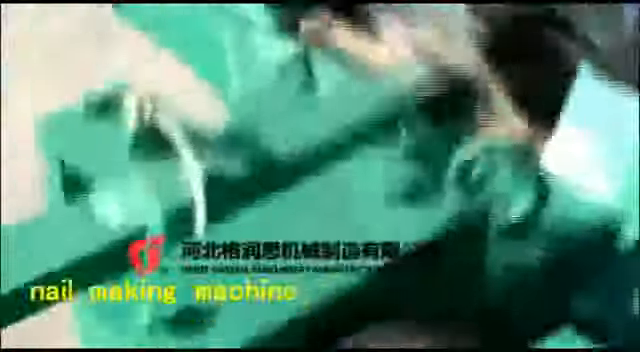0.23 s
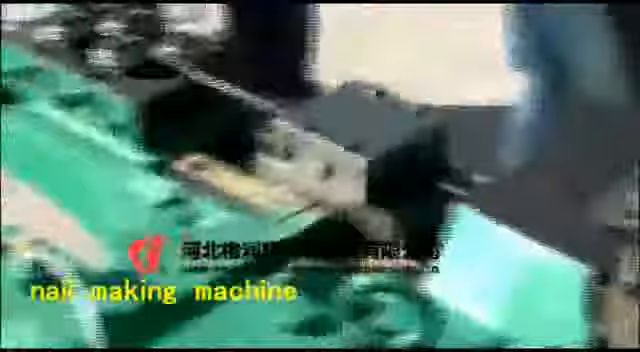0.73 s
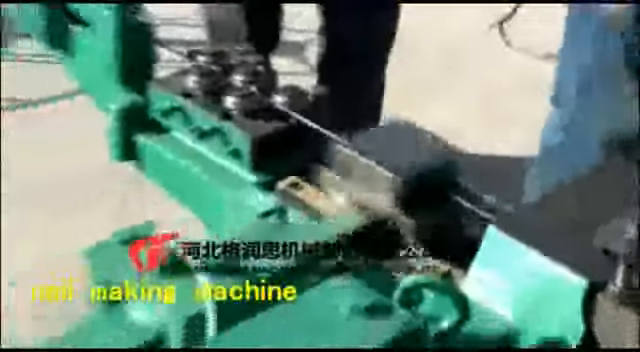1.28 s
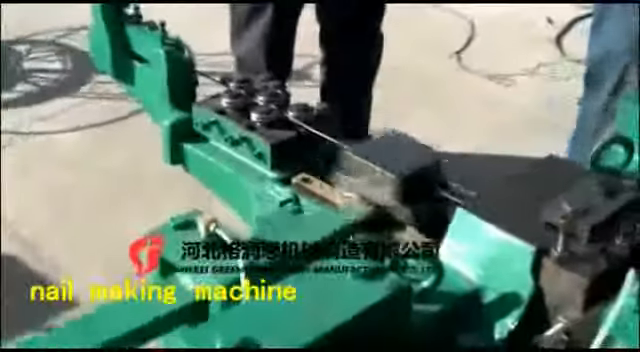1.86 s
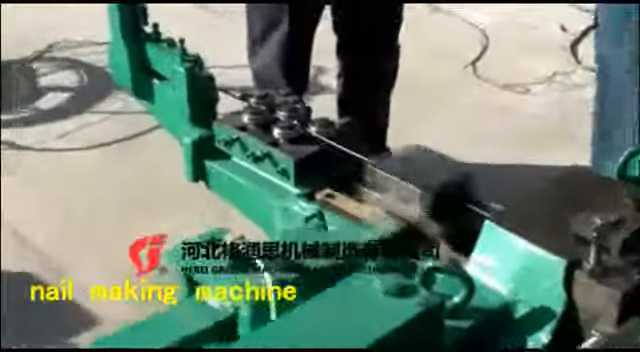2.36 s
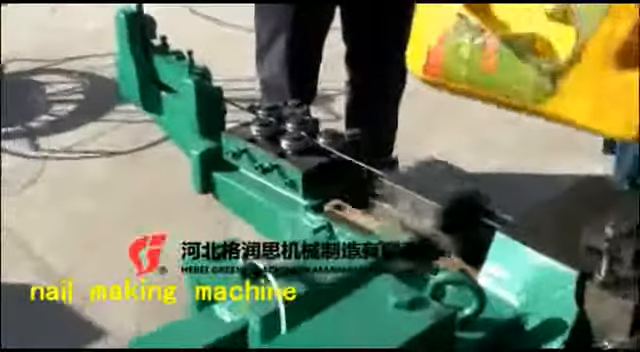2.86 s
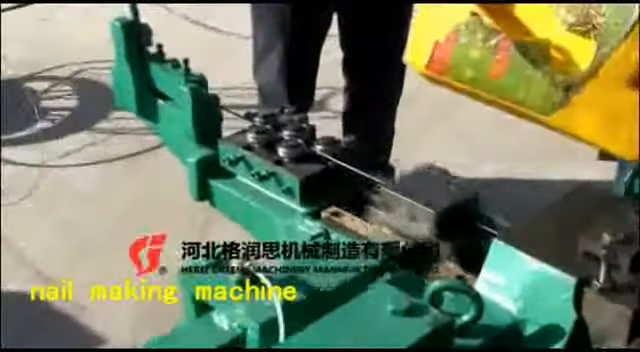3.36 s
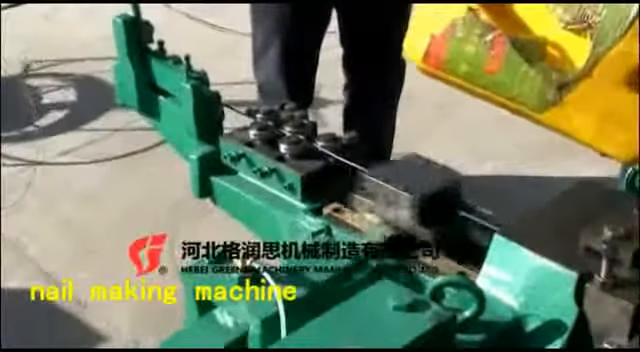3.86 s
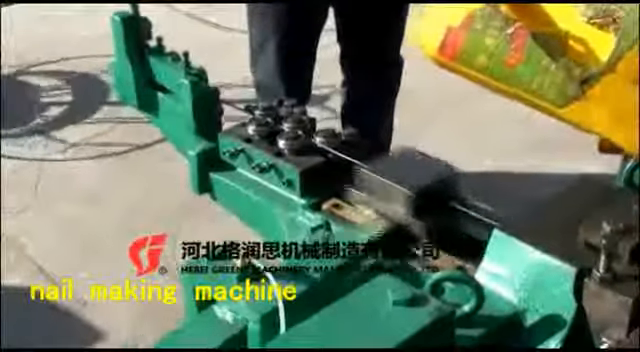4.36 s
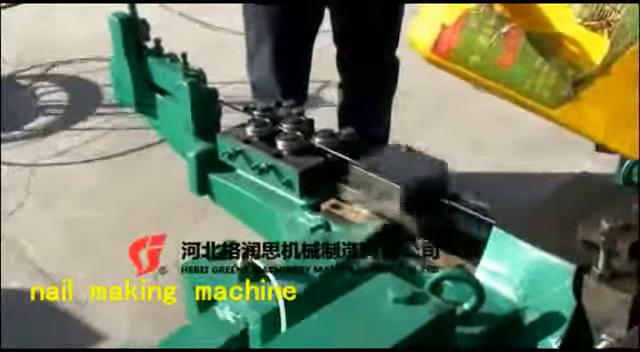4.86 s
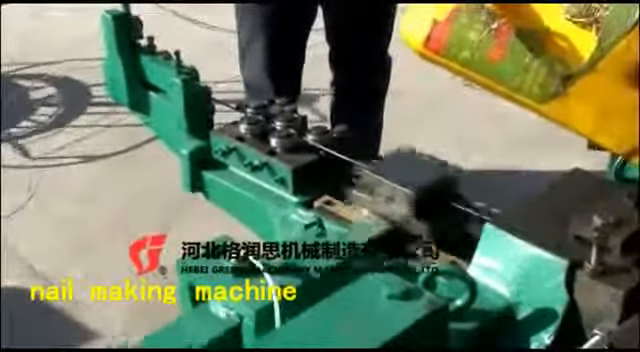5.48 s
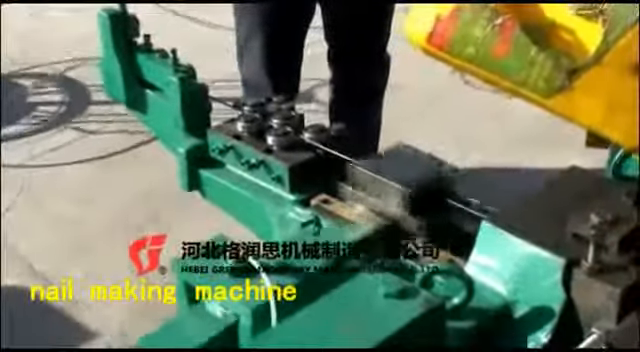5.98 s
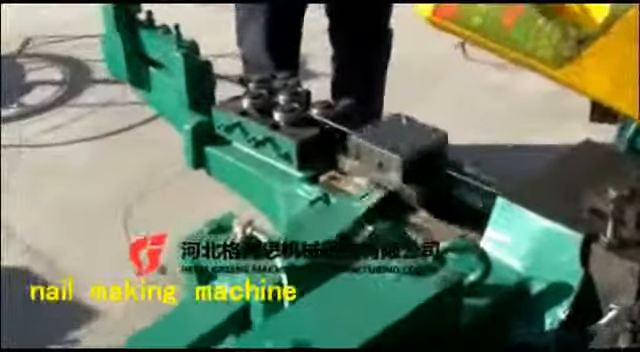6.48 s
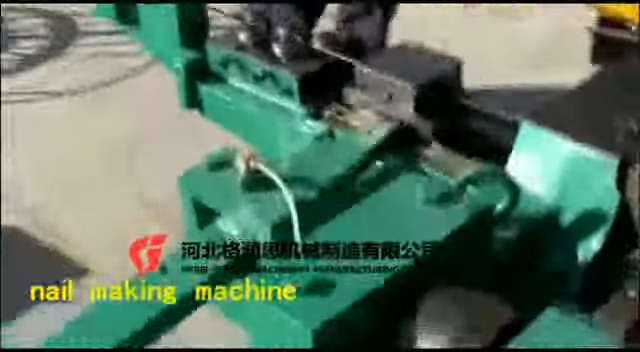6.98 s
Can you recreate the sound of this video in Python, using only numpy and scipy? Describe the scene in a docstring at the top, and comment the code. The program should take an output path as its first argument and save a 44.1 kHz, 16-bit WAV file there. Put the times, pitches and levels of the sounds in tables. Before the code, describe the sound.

From 0 to about 7 seconds a wire nail machine runs without pause in open air, close and somewhat to the right. The first punch lands almost at once, then one follows every 0.24 seconds at a fixed pace. Each turn starts with a short grip clunk, then a hard mid-pitched clank with a quick double edge and a shuddering, briefly ringing frame. Rapid gear ticks swell late in the turn; wire scrapes forward, and about 0.14 seconds after the punch blades snap it with a bright crack and rattle. Scrapes vary, rasping harder on some turns. Blows ease slightly around 2.7 seconds. Small high pings glitter irregularly throughout. Low wind puffs, stronger at left, pulse with the turns, weak from 2.4 to 4 seconds, stronger around 4.1 to 5.4 and again from 5.75. Everything is dense, narrow-band, compressed and crunchy at peaks, still running at the end.

```python
"""A wire nail machine hammers in open air, close by and to the right, a little over four nails a second.
On each turn the dies grip, the punch heads the nail and shakes the cast frame, the wire scrapes forward and
the cutters snap it off: shaped noise through resonances, plus decaying sines. Gears click all the while,
short high sines ping at chance moments, and a draught of low noise puffs once a turn.
A limiter and a narrow band squash the sum; the loudest peaks clip."""
import sys
import numpy as np
from scipy import signal
from scipy.fft import rfft, irfft
from scipy.io import wavfile
from scipy.ndimage import uniform_filter1d

SR = 44100
rng = np.random.default_rng(int(sys.argv[2]) if len(sys.argv) > 2 else 0)


def generate_wav(signal):
    """Clip the signal to [-1, 1] and save it as 16-bit WAV at the path in sys.argv[1]."""
    frames = np.transpose(np.atleast_2d(signal))
    scaled = np.clip(frames, -1, 1) * 32767
    pcm = np.round(scaled).astype(np.int16)
    wavfile.write(sys.argv[1], SR, pcm)


N = 318843

# Resonances of the frame and its tooling. Each row: centre in Hz, width in Hz, lift in dB.
FRAME = [(161.6, 24, 4), (258.5, 6.8, 3), (350.7, 55, 11), (377, 12, 7.5), (584, 29, 6.5), (815, 26, 7),
         (1083, 20, 4.5), (1427, 32, 8), (2283, 120, 1.5), (2687, 120, 5), (3144, 46, 9.5), (3956, 100, 8),
         (4893, 61, 9), (5400, 43, 9)]
# How much of the vibration repeats on every turn. Each row: pitch in Hz, share of power from 0 to 1.
ALIKE = [(50, 0.1), (160, 0.86), (350, 0.71), (800, 0.58), (1400, 0.42), (2500, 0.17), (5000, 0)]

FIRST_PUNCH_S, TURN_S = .0426, .23599
# One turn is built in a buffer of SIZE samples that opens LEAD_S before its punch.
SIZE, LEAD_S = 16384, .03
AGE = np.arange(SIZE) / SR - LEAD_S  # seconds since the punch
HZ = np.fft.rfftfreq(SIZE, 1 / SR)


def amp(db):
    """Decibels to gain."""
    return 10 ** (np.asarray(db) / 20)


def evened(x):
    """Scales to rms 1."""
    return x / np.sqrt(np.mean(x ** 2) + 1e-20)


def read(points, hz):
    """Reads a table along a log-frequency axis."""
    f, value = np.transpose(points)
    return np.interp(np.log(hz + 1), np.log(f + 1), value)


def colour(spectrum, resonances):
    """Minimum-phase response that gives white noise this spectrum, lifted at the resonances."""
    db = read(spectrum, HZ)
    for f, width, lift in resonances:
        db = db + lift / (1 + (2 * (HZ - f) / width) ** 2)
    log_gain = np.log(amp(db))
    # the Hilbert transform of the log gain gives the phase of a causal response
    mirrored = np.r_[log_gain, log_gain[-2:0:-1]]
    phase = -signal.hilbert(mirrored).imag[:len(HZ)]
    return np.sqrt(SR / 2) * np.exp(log_gain + 1j * phase)


def blow(at, rise, t60):
    """Force that builds up linearly and dies away exponentially, once in the turn; times in seconds."""
    age = AGE - at
    attack = np.clip(age / max(rise, 1 / SR), 0, 1)
    return attack * np.exp(-np.log(1000) * np.maximum(age - rise, 0) / t60)


def chatter(force, alike, count, patchy_db=0, size=40):
    """Spectra (turns, channels, bins) of metal contact: noise partly the same on every turn, partly new."""
    # Left-right likeness of the noise. Each row: pitch in Hz, likeness from 0 to 1.
    likeness = [(60, 0.34), (130, 1), (270, 0.87), (580, 0.88), (1230, 0.85), (2630, 0.52), (5590, 0.48)]
    z = rfft(force * rng.standard_normal((count + 1, 2, SIZE)))
    same = np.clip(read(likeness, HZ), 0, 1)
    z[:, 0] = same * z[:, 1] + np.sqrt(1 - same ** 2) * z[:, 0]
    # the repeating part feeds all pitches evenly, taken over `size` bins
    local_level = np.sqrt(uniform_filter1d(abs(z[0]) ** 2, size=size) + 1e-12)
    repeated = z[0] * np.linalg.norm(force) / local_level
    # the new part is louder at some pitches and softer at others
    patches = uniform_filter1d(rng.standard_normal((count, 1, len(HZ))), size=50)
    patches = evened(uniform_filter1d(patches, size=40))
    patches = np.tanh(patches)  # no pitch stands out far enough to ping
    fresh = z[1:] * amp(patchy_db * patches)
    alike = np.clip(alike, 0, 1)
    return np.sqrt(alike) * repeated + np.sqrt(1 - alike) * fresh


def wind(gust_db=1.5, gusts_per_s=14, side_db=2.0, shared=0.36):
    """Air buffets the microphone as low noise, stronger at left: it swells once a turn and gusts by chance."""
    # Tone of the buffeting. Each row: pitch in Hz, relative level in dB.
    air_tone = [(15, -16), (45, 2.5), (95, 5), (150, 0.5), (260, -22.5), (700, -45.5)]
    # Strength of the draught between its puffs. Each row: time in seconds, level in dB.
    draught = [(0, -34.5), (1.1, -37.5), (1.5, -32.5), (2.0, -33.5), (2.4, -47), (3.1, -50.5),
               (3.95, -49.5), (4.1, -30), (4.35, -28), (5.4, -34), (5.5, -45), (5.68, -43), (5.75, -26.5),
               (6.9, -33), (7.1, -40)]
    t = np.arange(N) / SR
    # the moving parts push air once a turn, after the punch
    puff_after_s, puff_width_s, puff_db = 0.064, 0.045, 7.5
    from_puff = (t - FIRST_PUNCH_S - puff_after_s + TURN_S / 2) % TURN_S - TURN_S / 2
    puffs = np.exp(-(from_puff / puff_width_s) ** 2)
    gusts = np.interp(t * gusts_per_s, np.arange(256), rng.standard_normal(256))
    tone_gain = amp(read(air_tone, np.fft.rfftfreq(N, 1 / SR)))
    left, other = irfft(rfft(rng.standard_normal((2, N))) * tone_gain, N)
    right = shared * left + other
    ports = np.array([amp(side_db) * evened(left), amp(-side_db) * evened(right)])
    strength_db = np.interp(t, *np.transpose(draught)) + puff_db * puffs + gust_db * gusts
    return ports * amp(strength_db)


def pings(level_db=-36, per_s=140, low_hz=2500, high_hz=5700, t60=0.068, spread_db=3, left_db=-6):
    """Short high decaying sines at chance moments, on 30 pitches."""
    t = np.arange(SR // 8) / SR
    out = np.zeros((2, N))
    pitches = np.geomspace(low_hz, high_hz, num=30)
    for hz, chance, side in zip(pitches, rng.random((30, N)), rng.standard_normal(30)):
        odds = per_s / 30 / SR  # of a ping at this pitch on any one sample
        at = np.flatnonzero(chance < odds)
        ping = np.sin(2 * np.pi * hz * t) * np.exp(-np.log(1000) * t / t60)
        ping = ping * np.sqrt(low_hz / hz)  # higher pings are softer
        sizes = amp(spread_db * np.minimum(-np.log(chance[at] / odds), 3))
        sides = amp([[left_db + 3 * side], [0]])
        for start, size in zip(at, sizes):
            out[:, start:start + len(t)] += size * sides * ping[:N - start]
    return amp(level_db) * evened(out)


def running(count):
    """Slides and bearings rumble all the way round as steady noise; one turn fades into the next."""
    # Rumble spectrum. Each row: pitch in Hz, level in dB per Hz before the frame's lift.
    rumble = [(20, -63), (50, -60.5), (110, -60), (160, -48.5), (250, -52), (470, -48.5), (620, -47),
              (1000, -52), (1900, -57), (2500, -60.5), (3200, -66.5), (4100, -75), (5600, -76)]
    fade_in, fade_out = AGE + LEAD_S, TURN_S - AGE
    force = np.sqrt(np.clip(np.minimum(fade_in, fade_out) / LEAD_S, 0, 1))
    return chatter(force, read(ALIKE, HZ), count, patchy_db=2.5) * colour(rumble, FRAME)


def gears(count, uneven=0.12):
    """Gear teeth meet as single clicks; their rate sags after the punch, climbs late, then falls back."""
    # Gear teeth over one turn. Each row: seconds after the punch, teeth a second, relative level in dB.
    teeth = [(0, 150, -11.5), (.06, 138, -8.5), (.115, 138, -20), (.135, 149, -3), (.15, 167, 4.5),
             (.172, 173, 2), (.19, 184, -7.5), (.21, 168, 0), (0.237, 152, -3.5)]
    # Tone of the clicks. Each row: pitch in Hz, relative level in dB per Hz.
    click_tone = [(300, -82), (600, -55), (800, -47), (1030, -49), (1300, -66.5), (2500, -75), (5500, -88)]
    s, rate, db = np.transpose(teeth)
    tooth = np.floor(np.cumsum(np.interp(AGE, s, rate)) / SR)
    clicks = np.diff(tooth, prepend=0) * (AGE >= 0) * (AGE < TURN_S)
    force = clicks * np.sqrt(SR / rate.mean()) * amp(np.interp(AGE, s, db))
    strikes = force * (1 + uneven * rng.standard_normal((count, 1, SIZE)))
    return rfft(strikes) * colour(click_tone, [])


def ringing(count, spread_db=2.5, detune=0.0066):
    """Frame and tooling modes ring as decaying sines, struck almost alike each time."""
    # Modes that ring on every turn.
    # Each row: seconds after the punch, pitch in Hz, relative level in dB, rise in seconds, t60 in seconds.
    modes = [(0, 1422, -10, 0.0074, 0.093), (-.001, 582, -5, 0.0015, 0.027), (.005, 349, -15, 0.018, .29),
             (.016, 165, -18.5, 0.026, 0.16), (.026, 253, -20.5, 0.03, 0.45),
             (0.055, 2400, -27, 0.046, 0.12), (.06, 572, -16.5, 0.0077, 0.42),
             (-0.0072, 2200, -21.5, 0.0019, 0.05), (-0.012, 4790, -29.5, 0.032, 0.078)]
    out = 0
    for at, hz, db, rise, t60 in modes:
        size, pitch = rng.standard_normal((2, count, 1, 1))
        envelope = amp(db + spread_db * size) * blow(at, rise, t60)
        mode_hz = hz * (1 + detune * pitch)
        out = out + envelope * np.sin(2 * np.pi * mode_hz * (AGE - at))
    return rfft(out)


def feeding(count, slip_db=3.5):
    """Wire drags through the straightening rollers until the cut: noise that sticks and slips anew each turn."""
    # Tone of the scrape. Each row: pitch in Hz, relative level in dB per Hz.
    scrape_tone = [(700, -75), (2400, -58.5), (3200, -58), (4200, -61.5), (5600, -62.5), (7000, -72.5)]
    force = np.interp(AGE, [.088, .115, .138, .146], [0.2, 0.69, 1, 0.048])
    slip_noise = uniform_filter1d(rng.standard_normal((count, 1, SIZE)), size=130)
    slips = amp(slip_db * evened(slip_noise))
    scrape = irfft(chatter(force, 0, count, patchy_db=3.5)) * evened(slips)
    return rfft(scrape) * colour(scrape_tone, [])


def cutting(count):
    """The blades snap through the wire and meet in two short noise blows; the slide rattles back."""
    # Resonances of the cutter blades. Each row: centre in Hz, width in Hz, lift in dB.
    blade_modes = [(801, 53, 14), (1894, 220, 17.5), (3040, 57, 7), (3195, 110, 11.5), (4300, 62, 7),
                   (4800, 90, 4.5), (5200, 43, 5.5)]
    # Tones of the snap and of the returning slide. Each row: pitch in Hz, relative level in dB per Hz.
    snap_tone = [(300, -65.5), (800, -39.5), (1400, -44), (2400, -48), (3300, -41.5), (4500, -44),
                 (5600, -46), (9000, -42)]
    return_tone = [(400, -66), (800, -54.5), (1050, -48), (1400, -52.5), (2000, -54.5), (2500, -59.5),
                   (3200, -59), (4500, -62.5), (5600, -66.5)]
    snap = blow(.1444, 0.00028, 0.015) + amp(-7) * blow(.1472, 0, 0.017)
    blades = chatter(snap, 0.75, count, size=400) * colour(snap_tone, blade_modes)
    rattle = chatter(blow(0.1392, 0.0086, 0.29), read(ALIKE, HZ), count, patchy_db=6.5)
    return blades + rattle * colour(return_tone, FRAME)


def heading(count):
    """The dies close, the punch strikes and seats, and the frame shudders as the load lets go."""
    # Tones of the three stages. Each row: pitch in Hz, relative level in dB per Hz.
    grip_tone = [(60, -60.5), (160, -57.5), (250, -53), (400, -45), (800, -53.5), (1900, -63.5),
                 (2600, -55), (4700, -64), (5500, -58)]
    punch_tone = [(60, -65), (250, -50), (380, -44), (650, -43), (1050, -47), (1400, -46.5), (1900, -47),
                  (2500, -54), (3200, -59), (3900, -57.5), (4800, -75.5), (5600, -66)]
    shudder_tone = [(25, -64), (55, -51.5), (110, -55.5), (170, -44.5), (330, -44), (500, -52.5),
                    (1050, -46), (1900, -52.5), (2600, -54), (3300, -60.5), (5500, -69.5)]
    alike = read(ALIKE, HZ)
    grip = chatter(blow(-0.013, 0.0032, 0.1), alike, count, patchy_db=5) * colour(grip_tone, FRAME)
    crack = amp(-2) * blow(0, 0, .016) + amp(-4) * blow(.0068, 0, .016)
    strike = crack + blow(0, 0, 0.26) + amp(-11.5) * blow(0.025, 0, 0.08)
    punch = chatter(strike, alike, count, patchy_db=5.0, size=80) * colour(punch_tone, FRAME)
    release = blow(0.02, 0.021, 0.2) + amp(-3.5) * blow(0.023, 0, 0.043)
    shudder = chatter(release, alike, count, patchy_db=4.5) * colour(shudder_tone, FRAME)
    return grip + punch + shudder


def machine():
    """Lays the turns end to end at a steady speed; the machine is already running at the start."""
    # Weight of the punch, uneven but easing overall. Each row: time in seconds, level in dB.
    weight = [(0, .5), (2.1, -0.1), (2.7, -2.6), (4, -1), (4.7, -2.66), (7.2, -1.5)]
    # Turns on which the wire binds in the rollers. Each row: turn counted from 0, scrape level in dB.
    binds = [(0, 5.5), (2, 6), (5, 2.5), (7, -0.5), (9, 1), (10, 3.5), (11, 1.5), (14, -1), (15, 4),
             (16, 3.5), (19, 5), (22, 4), (26, 3.5), (28, 2.5), (30, 4)]
    # The machine stands to the right. Each row: pitch in Hz, left minus right in dB.
    lean = [(60, 0), (110, 0), (220, -5), (350, -5.8), (560, -3.2), (850, -5), (1420, -7.7), (2800, -5),
            (5600, -10)]
    punch_spread_db, cut_spread_db, feed_spread_db = 0.32, 4, 0.5  # chance from turn to turn
    cut_db, free_feed_db = .7, -11  # the cutters; the wire when it slides freely
    turns = np.arange(-1, int(N / SR / TURN_S) + 1)
    s, count = FIRST_PUNCH_S + turns * TURN_S, len(turns)
    chance = rng.standard_normal((count, 3)).T
    punch_db = np.interp(s, *np.transpose(weight)) + punch_spread_db * chance[0]
    scrape_db = free_feed_db + feed_spread_db * chance[1]
    for number, db in binds:
        scrape_db[turns == round(number)] = db
    turn_db = [punch_db, scrape_db, cut_db + cut_spread_db * chance[2]]
    punch, scrape, cut = amp(turn_db)[:, :, None, None]
    z = running(count) + gears(count)
    z = z + punch * (heading(count) + ringing(count))
    z = z + scrape * feeding(count) + cut * cutting(count)
    sides = amp(np.outer([.5, -.5], read(lean, HZ)))
    out = np.zeros((2, N + 2 * SR))  # a second to spare at each end
    for start, turn in zip(s, irfft(z * sides / sides.mean(0))):
        first = SR + round((start - LEAD_S) * SR)
        out[:, first:first + SIZE] += turn
    return out[:, SR:SR + N]


def scene():
    """The machine in open air, the high pings, and the draught."""
    return machine() + pings() + wind()


def low_pass(x, hz):
    """Steep linear-phase low-pass."""
    taps = signal.firwin(301, hz, window=("kaiser", 8), fs=SR)
    return signal.oaconvolve(x, taps[None], "same")


def record(dry, threshold_db=-3.0, share=0.93, recover_db_per_s=380, band_hz=5700, edge_hz=16000):
    """Recording chain: a fast limiter ducks loud moments, a low-pass narrows the band, remaining peaks clip."""
    power_db = 10 * np.log10(abs(uniform_filter1d((dry ** 2).max(0), size=40)) + 1e-12)
    # the held level jumps up with each peak and falls back at a steady rate
    fall = np.arange(N) * recover_db_per_s / SR
    held_db = np.maximum.accumulate(power_db + fall) - fall
    over_db = np.maximum(held_db - threshold_db, 0)
    ducked = dry / amp(share * uniform_filter1d(over_db, size=24))
    # a soft knee rounds off peaks that slip past the limiter
    rounded = ducked / (1 + (ducked / 1.2) ** 6) ** (1 / 6)
    clipped = np.clip(low_pass(rounded, band_hz), -1, 1)
    return low_pass(clipped, edge_hz)


dry = scene()
out = record(dry)
generate_wav(out)
```